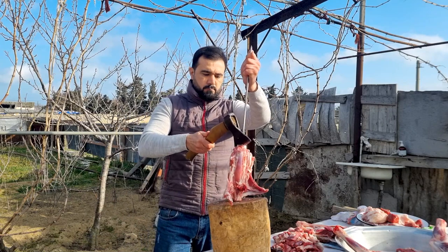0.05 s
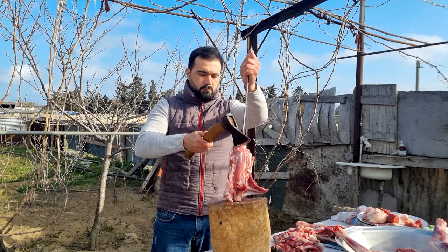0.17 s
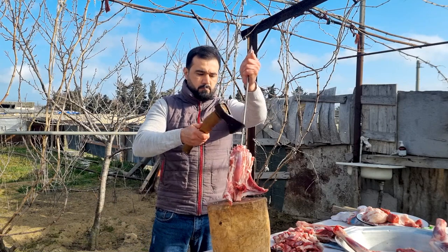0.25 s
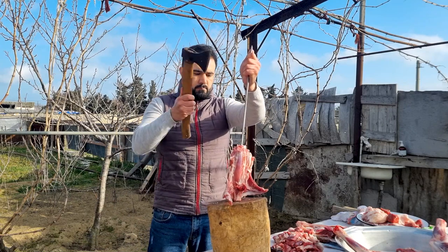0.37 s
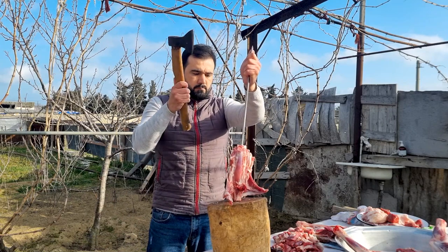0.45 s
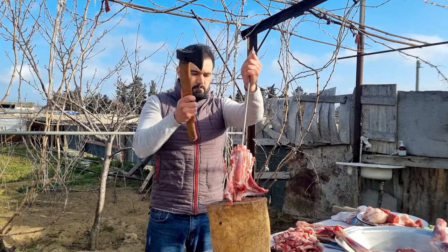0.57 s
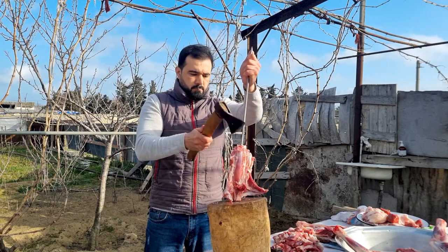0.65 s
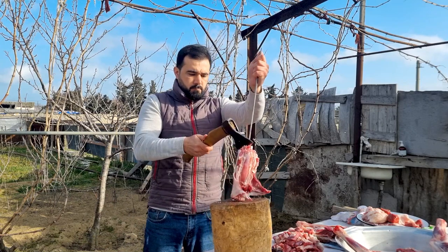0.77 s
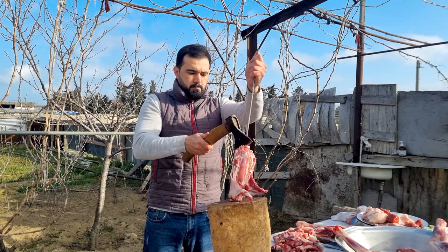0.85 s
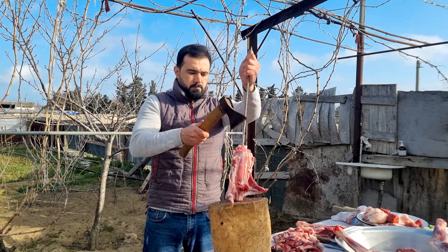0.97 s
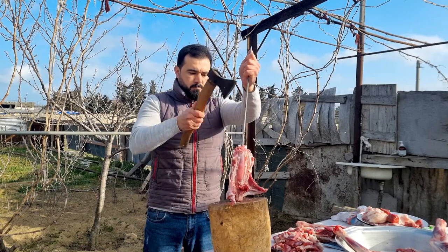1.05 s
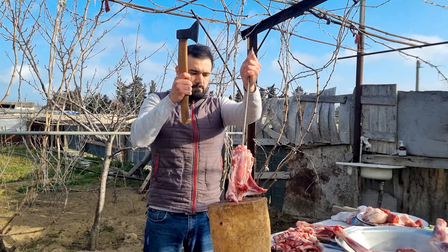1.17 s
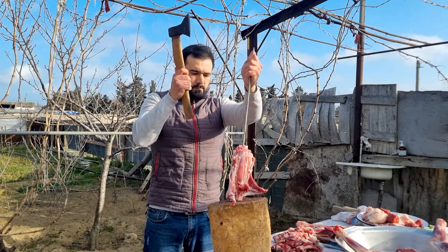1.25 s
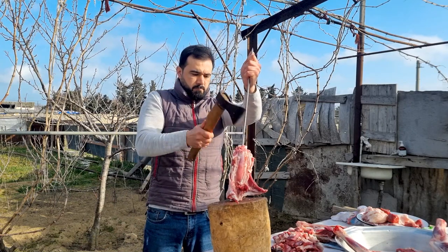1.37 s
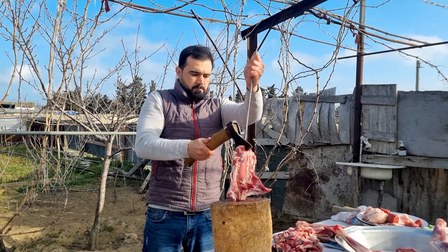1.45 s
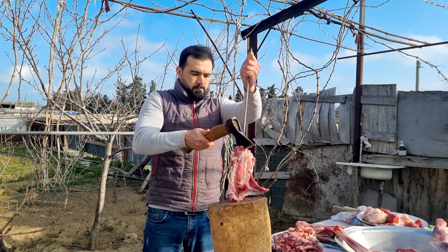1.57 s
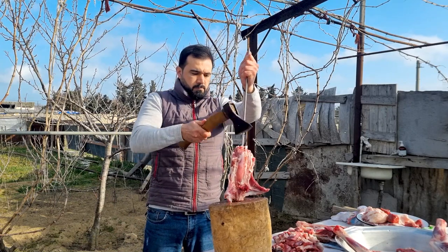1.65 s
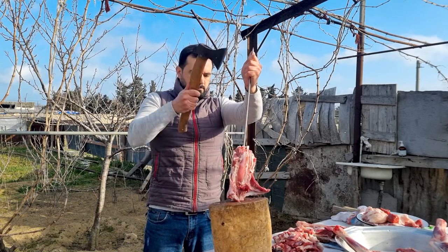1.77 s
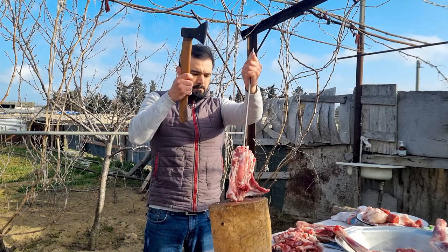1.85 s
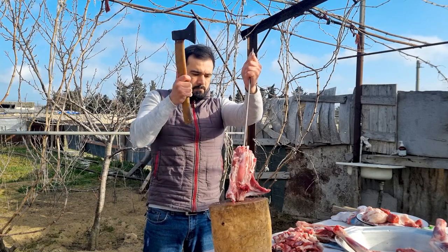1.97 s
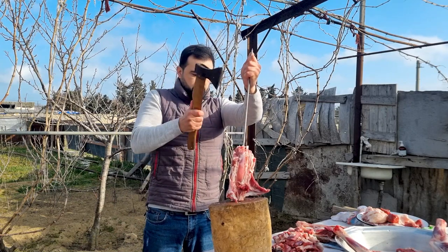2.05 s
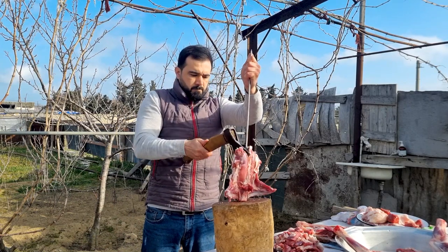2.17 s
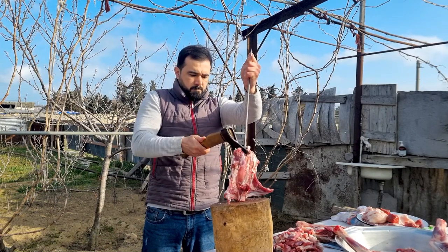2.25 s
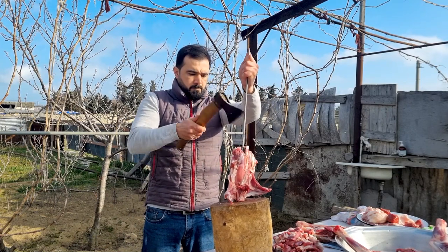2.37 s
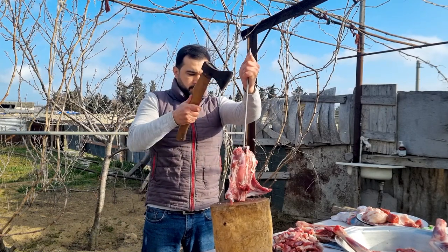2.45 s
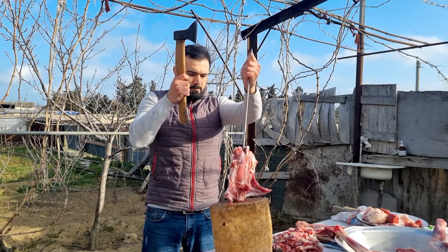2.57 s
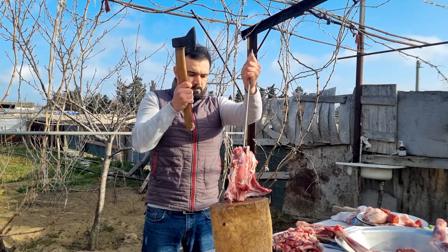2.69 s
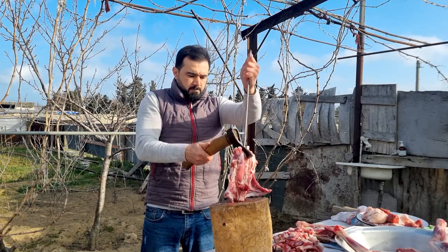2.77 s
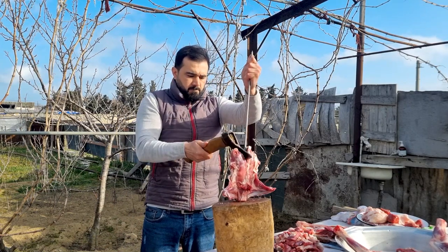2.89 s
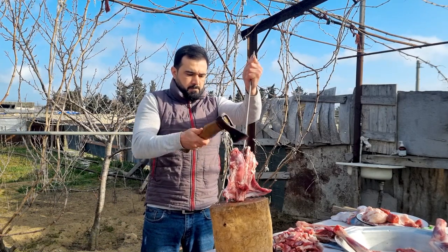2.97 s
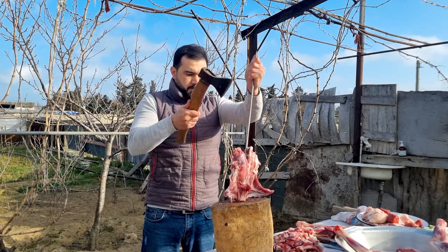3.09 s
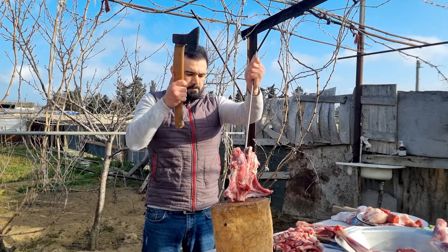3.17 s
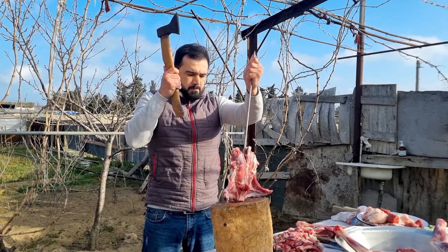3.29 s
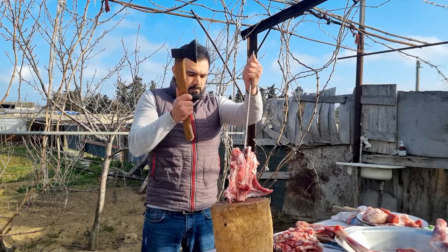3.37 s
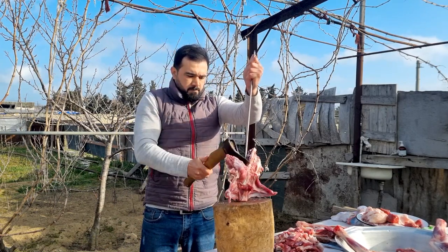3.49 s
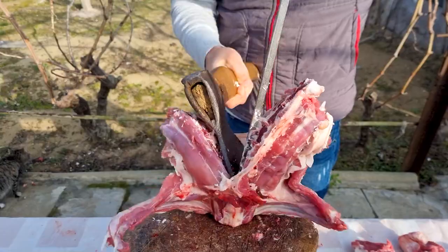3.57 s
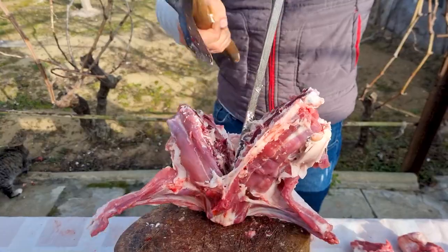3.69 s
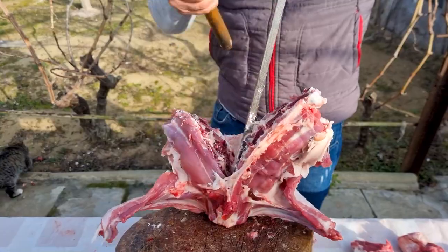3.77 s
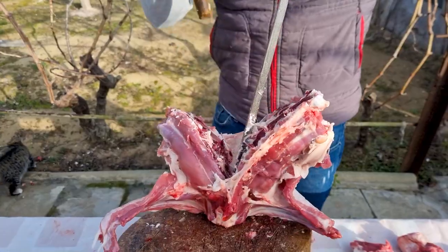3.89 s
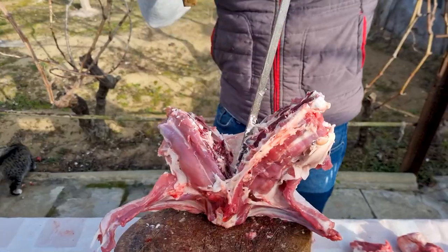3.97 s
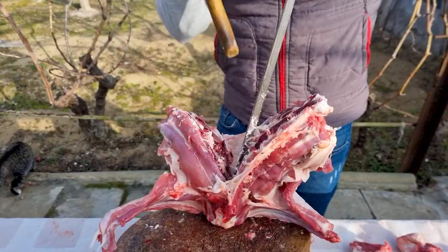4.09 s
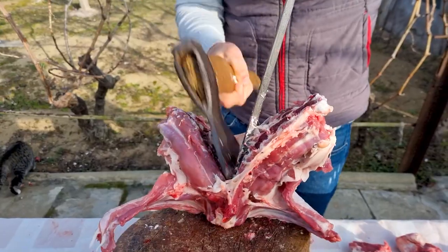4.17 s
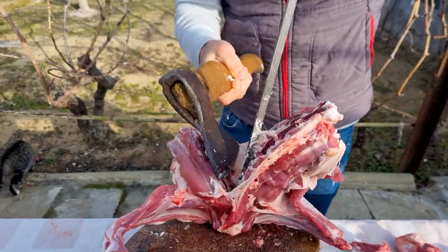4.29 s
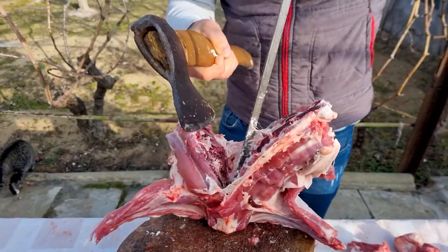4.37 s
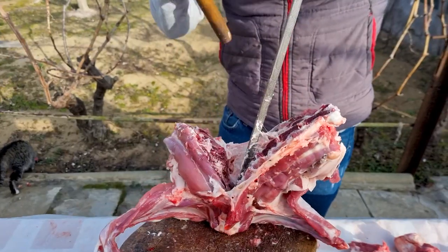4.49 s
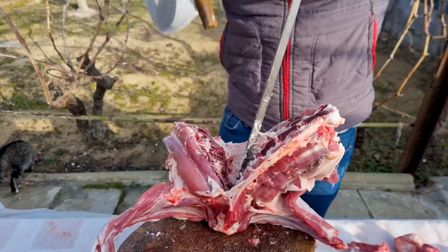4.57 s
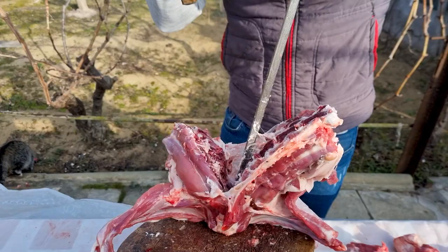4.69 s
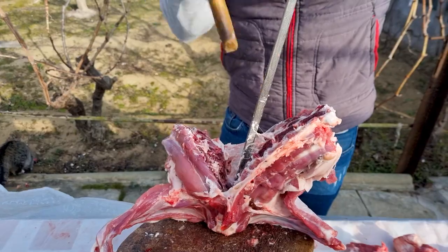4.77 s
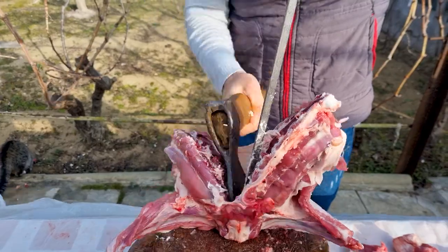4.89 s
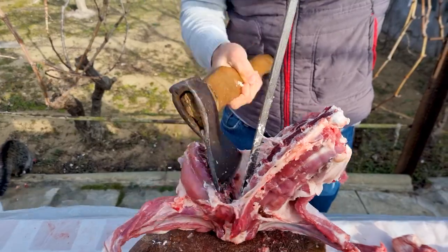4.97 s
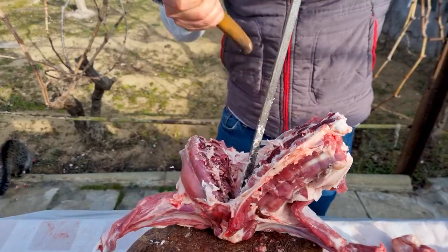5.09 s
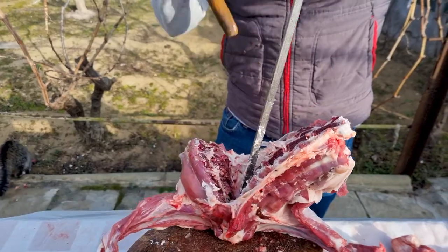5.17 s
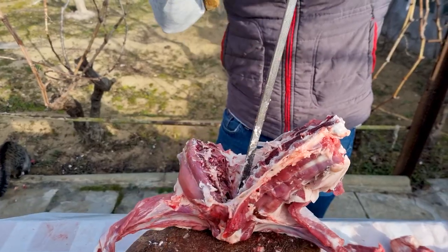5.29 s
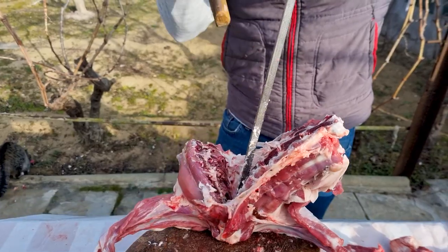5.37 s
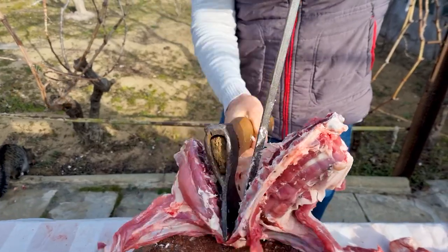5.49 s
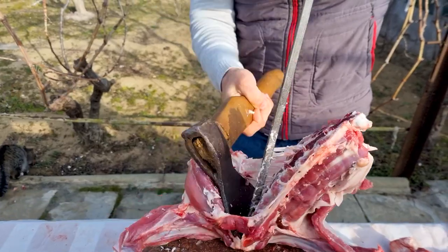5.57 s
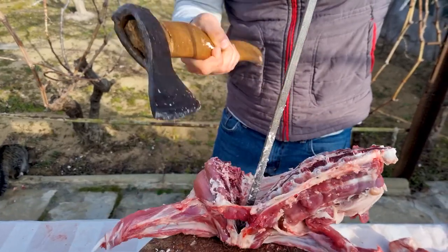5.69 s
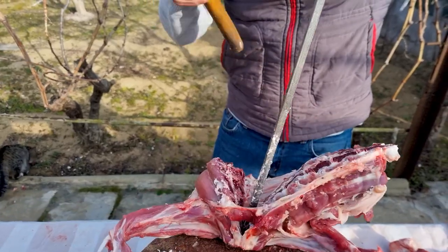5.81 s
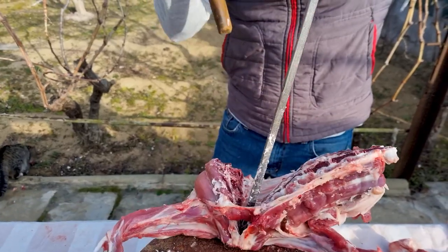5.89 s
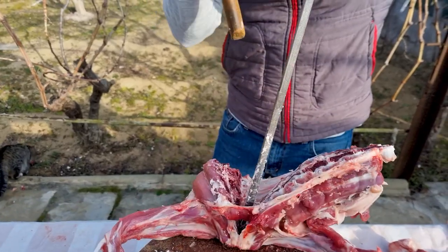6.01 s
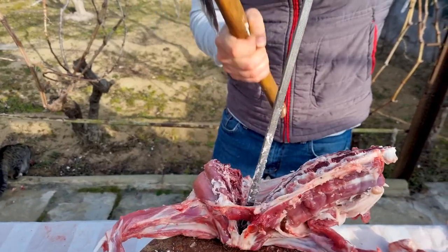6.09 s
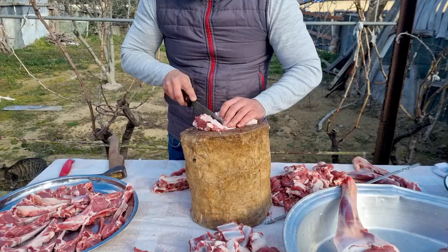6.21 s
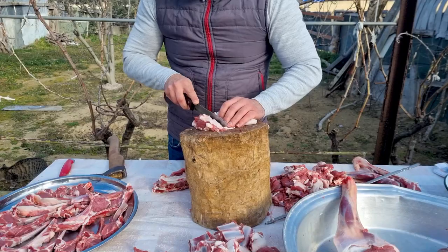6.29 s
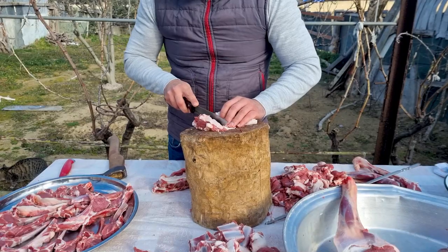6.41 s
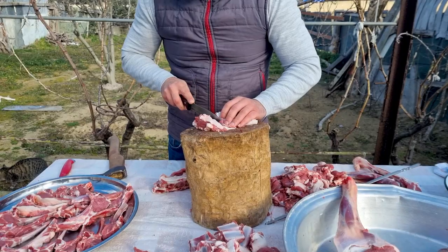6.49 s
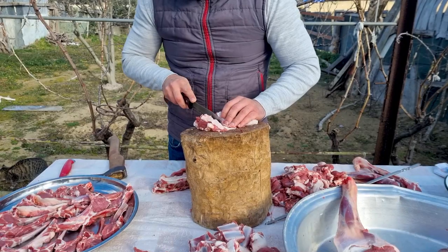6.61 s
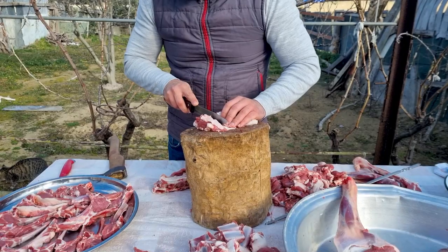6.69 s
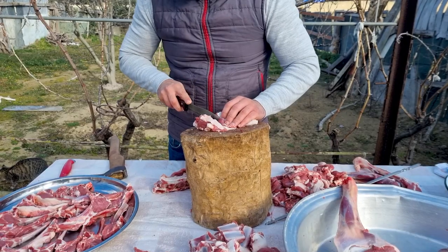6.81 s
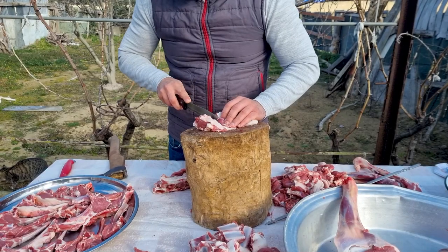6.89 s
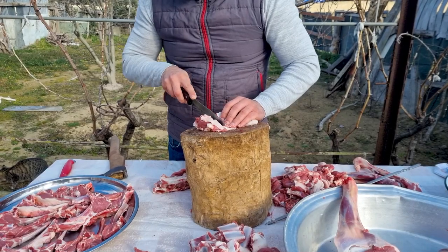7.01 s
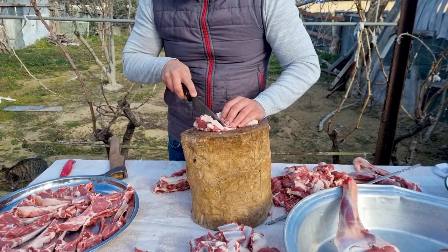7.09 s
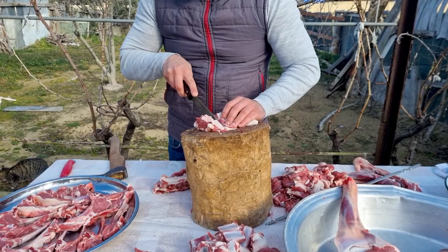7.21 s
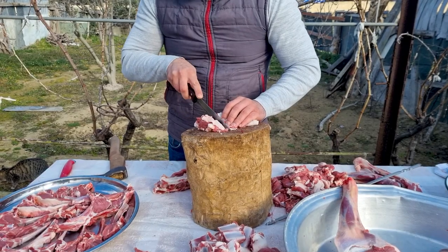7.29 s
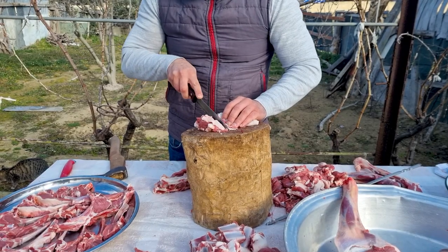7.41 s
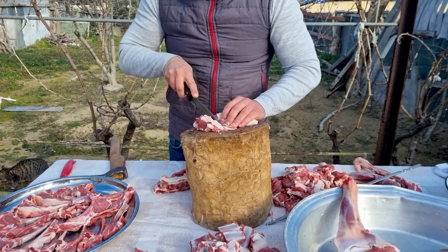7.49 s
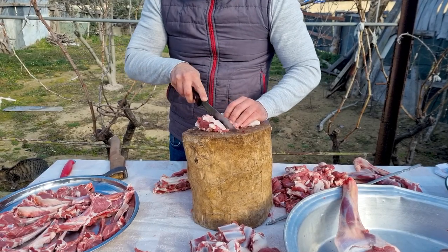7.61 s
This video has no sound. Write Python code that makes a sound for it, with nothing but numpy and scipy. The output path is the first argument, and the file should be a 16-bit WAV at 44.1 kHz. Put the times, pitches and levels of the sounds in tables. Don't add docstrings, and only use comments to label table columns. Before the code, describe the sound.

A hatchet chops a carcass at a steady pace, steel pinging, bone crunching and wood knocking, until the blows stop and a soft windy hush remains.

```python
import sys
import numpy as np
from scipy import signal
from scipy.fft import rfft, irfft, next_fast_len
from scipy.io import wavfile
from scipy.ndimage import uniform_filter1d, map_coordinates

SR = 44100
rng = np.random.default_rng(int(sys.argv[2]) if len(sys.argv) > 2 else 0)


def waveform_to_disk(signal):
    frames = np.transpose(np.atleast_2d(signal))
    scaled = np.clip(frames, -1, 1) * 32767
    samples = np.round(scaled).astype(np.int16)
    wavfile.write(sys.argv[1], SR, samples)


def voltage_ratio(level):
    return 10 ** (np.asarray(level, float) / 20)


N = 337365
TIME = np.arange(N) / SR
STEP = np.arange(0, N, 32) / SR
CLOSE_S, MONO_S = 3.76, 6.345

# frequency in Hz, level in dB per Hz.
CRACK = [(530, -40.5), (900, -4), (1710, 4), (2200, -1.5), (2690, 0), (3590, -5), (5290, -1.5),
         (6450, -6.5), (7800, -31), (10100, -60), (17200, -120)]
# frequency in Hz, level in dB per Hz.
CRUNCH = [(710, -34), (1200, -5), (1710, -7), (2340, -8.5), (2770, -8), (5570, -15), (7800, -27),
          (10100, -58.5), (17200, -120)]
# frequency in Hz, level in dB per Hz.
AIR = [(6500, -59), (7600, -17), (9000, -10.5), (10700, -9.5), (11900, 1.5), (13000, 0), (15600, -6.5),
       (16100, -38)]
# frequency in Hz, level in dB per Hz.
WOOD = [(130, -27), (220, -6.5), (806, -11.5), (899, -14.5), (1540, -14), (1720, -16.5), (1900, -22),
        (2470, -47), (4180, -120)]
# frequency in Hz, level in dB per Hz.
TABLE = [(45, -10), (100, 3.5), (190, -6), (280, -13.5), (500, -62)]
# frequency in Hz, likeness as a ratio.
ALIKE = [(100, 1), (500, 0.67), (1000, -0.22), (2500, -0.54), (5000, 0.13), (12000, -2.3)]
# frequency in Hz, left minus right in dB.
WIDE = [(60, -9.5), (150, 0.5), (380, 3.5), (950, 4.5), (2380, 7.5), (5980, 14), (15000, 10.5)]
# frequency in Hz, left minus right in dB.
CLOSE = [(60, 0), (150, -5.5), (380, 4.5), (950, 1), (2380, 8), (5980, 11.5), (15000, -9)]


def chops():
    crack, pings = contacts()
    knock, knock_tones = knocks()
    crunch_db, steel_db, table_db = rattle()
    close = TIME > CLOSE_S
    grit = voltage_ratio(crunch_db + wobble(500)[0] + 0.79 * wobble(70)[0] - 3.5)
    dry = pings + knock_tones
    dry += coloured(crack * pair(ALIKE), CRACK) + coloured(grit * pair(ALIKE), CRUNCH)

    dulling_db = 0.6 * (crunch_db + 34) - 4 - 2.5 * np.maximum(-46 - crunch_db, 0)
    treble = 3 * crack ** 1.393 + grit * voltage_ratio(dulling_db + 8.4 * wobble(40)[0])
    dry += voltage_ratio(np.where(close, -13, -19)) * coloured(treble * pair([(9000, 0.3)]), AIR)

    over_grit_db = steel_db - crunch_db - 0.38 * np.maximum(steel_db + 61, 0) + 17
    over_grit_db = over_grit_db - 8.5 * (TIME > CLOSE_S - 0.3)
    dry += filtered(grit * voltage_ratio(over_grit_db) * pair(ALIKE), blade)

    wood_rattle = voltage_ratio(crunch_db + 1.9 * wobble(98)[0] - 2)
    dry += coloured((knock + voltage_ratio(-15.5) * crack + wood_rattle) * pair(ALIKE), WOOD)
    dry += voltage_ratio(table_db - 3) * coloured(pair(ALIKE), TABLE)
    return tilted(dry * (TIME < CLOSE_S), WIDE) + tilted(dry * (TIME >= CLOSE_S), CLOSE)


def tilted(x, tilt):
    return filtered(x, lambda hz: voltage_ratio(np.outer([0.5, -0.5], along(tilt, hz))))


# edge contact in seconds, edge level in dB, edge ping in Hz, bone delay in seconds, bone level in dB.
CUT = [
    (.7285, -5, 5170, 0.0051, -22),
    (1.4613, -6.5, 2685, 0.0045, -14),
    (2.158, -6.5, 5585, 0.0027, -6),
    (2.8491, -5.5, 2730, 0.0049, -10),
    (3.5148, -6.5, 5160, .003, -8),
    (4.2328, -6, 5530, 0.0066, -29.5),
    (4.9054, -5, 5660, .0062, -19),
    (5.5415, -2.5, 3830, .0056, -17.5),
    (6.1881, -2.5, 4110, 0.0094, -8),
]
# start in seconds, peak level in dB, ping in Hz.
TICK = [
    (.5854, -66, 1482),
    (.8918, -42.5, 5700),
    (1.4654, -11.5, 5180),
    (1.6482, -48, 4000),
    (2.359, -61.5, 2460),
    (3.5962, -21, 5480),
    (4.262, -20, 5320),
    (4.2744, -24, 1770),
    (4.593, -57.5, 2610),
]


def contacts():
    crack, pings = np.zeros((2, N)), np.zeros((2, N))
    t = np.arange(SR // 8) / SR
    hits = [(s, db, hz, 0.026) for s, db, hz, *_ in CUT]
    hits += [(s + late, db, 2800, 0.038) for s, *_, late, db in CUT]
    hits += [(s, db - 5.5, hz, 0.026) for s, db, *_ in REBOUND for hz in (1696, 3525)]
    hits += [(*row, 0.03) for row in TICK]
    for s, db, hz, t60 in hits:
        side = lean(-0.2 * (db + 5.5))
        add(crack, s, voltage_ratio(db - 8 - 60 * t / t60) * side)
        ring = np.sin(2 * np.pi * hz * t + [[0], [1.1]]) * (1 - np.exp(-t / 0.00033))
        add(pings, s, voltage_ratio(db - 60 * t / 0.0089) * side * ring)
    slide = t[:1400]
    for s, *_ in THUMP:
        add(crack, s - 0.04, voltage_ratio(-87 + 32 * slide / 0.02 + 9 * (s > CLOSE_S))[None])
    return crack, pings


# start in seconds, peak level in dB, pitch in Hz.
KNOCK = [(.743, -9, 374), (.749, -14.5, 347), (.834, -34, 458), (1.484, -18.5, 284.5), (1.489, -3.5, 526),
         (1.509, -21.5, 290), (1.597, -27.5, 334), (2.163, -16, 1180), (2.19, -22.5, 366),
         (2.853, -18, 1273), (2.874, -3, 322.5), (3.024, -42.5, 435), (3.525, -17, 1040), (3.538, -12, 685),
         (3.545, -7.5, 317), (3.597, -22.5, 279), (3.654, -19.5, 506), (4.235, -16.5, 322),
         (4.259, -26, 279), (4.593, -60.5, 1327), (4.914, -27, 283.6), (4.928, -18.5, 342),
         (5.277, -42.5, 610), (5.549, -9, 326), (5.568, -17, 283), (6.199, -8.5, 724),
         (6.219, -15.5, 305.5)]
# start in seconds, click level in dB, knock level in dB, knock in Hz.
REBOUND = [(.791, -24.5, -20.5, 776), (1.5384, -18, -12, 680), (2.2323, -22.5, -16, 840),
           (2.9223, -26.5, -16.5, 818), (3.58, -26, -15, 281), (3.6366, -22, -13.5, 451),
           (3.686, -39, -18.5, 374.5), (4.3, -24.5, -21, 278), (4.3224, -41, -22.5, 494),
           (4.3533, -45, -22, 428), (4.972, -24.5, -26, 507), (4.9955, -41, -22.5, 287),
           (5.034, -46, -29, 467), (5.6088, -23.5, -31, 334), (5.6373, -41, -21.5, 283),
           (5.676, -45, -20.5, 469), (6.2547, -23, -33, 301), (6.33, -46.5, -30.5, 501)]


def knocks():
    knock, tones = np.zeros((2, N)), np.zeros((2, N))
    t = np.arange(SR // 8) / SR
    for s, db, hz in KNOCK + [(s, db, hz) for s, _, db, hz in REBOUND]:
        t60 = 0.058 - 0.0018 * (db + 20)
        fall = voltage_ratio(db - 60 * t / t60) * (1 - np.exp(-t / 0.0012))
        add(knock, s, voltage_ratio(-5) * fall[None])
        add(tones, s, fall * np.sin(2 * np.pi * hz * t - [[0], [1.1]]) * voltage_ratio(-2.5))
    return knock, tones


# crunch in dB, table in dB, crunch fall by 60 dB in seconds, seconds until it lies still.
RATTLE = [
    (-25, -17.5, 0.24, 0.14),
    (-23.5, -14.5, .26, 0.14),
    (-26, -21, .27, .2),
    (-23, -16.5, .26, .19),
    (-25.5, -14, 0.38, .165),
    (-31.5, -17.5, 0.31, 0.14),
    (-28, -15, 0.23, .13),
    (-31, -17.5, 0.32, .13),
    (-26.5, -17.5, 0.22, 0.12),
]


def rattle():
    start = np.array(THUMP)[:, :1] + 0.003
    crunch, table, t60, still = np.array(RATTLE).T[..., None]
    settle = 398.5 * np.maximum(STEP - start - still, 0)
    steel_db = crunch - 900 * np.maximum(STEP - MONO_S, 0)
    fall = 60 / t60
    return [held_db(start, 0, steel_db - 0.43 * settle, 15000, fall),
            held_db(start, 0, steel_db, 15000, fall),
            held_db(start, 0, table - settle, 15000, 0.72 * fall)]


# start in seconds, pitch in Hz, level in dB, hold in seconds,
# lean to the left in dB.
THUMP = [
    (0.7358, 115, -11.5, 0.012, -1.5),
    (1.47, 119.8, -12, 0.034, -0.5),
    (2.1695, 115, -17, .013, -1.5),
    (2.8584, 115.8, -13, 0.026, -2.5),
    (3.5287, 113.7, -17, .035, -0.7),
    (4.239, 104, -16.5, .015, -10),
    (4.9143, 109.6, -12, 0.016, -9.5),
    (5.552, 95.3, -11.5, .029, -3.5),
    (6.202, 99, -8, .0069, 0),
]


def block():
    out, t = np.zeros((2, N)), np.arange(SR // 5) / SR
    for s, hz, db, held, left_db in THUMP:
        upper_db = 1.5 if s < CLOSE_S else -13.5
        fall = voltage_ratio(db - 230 * t - 60 * np.maximum(t - held, 0) / 0.09) * (1 - np.exp(-t / 0.0012))
        upper = voltage_ratio(upper_db) * np.sin(2 * np.pi * 1.55 * hz * t)
        swing = fall * (np.sin(2 * np.pi * hz * t) + upper)
        add(out, s, lean(left_db) * [swing, np.interp(t - 0.0005, t, swing)])
    return out


# start in seconds, pitch in Hz, level in dB,
# fall by 60 dB in seconds, rise in seconds.
RING = [(0, 1640, -71.5, 0.94, .001), (.968, 5170, -53.5, 0.21, 0.0056), (1.545, 1880, -50, 0.37, 0.0063),
        (1.645, 5180, -59, 0.22, 0.0085), (2.5443, 4780, -49.5, 0.021, 0.00046),
        (2.545, 5860, -49, 0.017, 0.00031), (3.735, 5090, -73, 0.22, 0.008), (4.315, 5150, -63, 0.29, .003),
        (5.625, 5230, -62, .3, .0023), (6.265, 1770, -34.5, 0.074, 0.0039), (6.295, 5240, -62, 0.098, .003)]
# start in seconds, hold in seconds, hiss in dB, steel in dB.
SCRAPE = [
    (0.139, 0.042, -54.5, -47),
    (.9, 0.048, -66.5, -45),
    (1.652, 0.022, -70, -53),
]
# frequency in Hz, level in dB per Hz.
SCRAPE_TONE = [(410, -40), (700, -17), (2550, -2), (3540, -11.5), (4570, -7), (6520, -15), (8000, -33),
               (10400, -62.5), (17600, -120)]


def steel():
    out, t = np.zeros((2, N)), np.arange(SR // 2) / SR
    for s, hz, db, t60, rise in RING:
        fall = voltage_ratio(db - 60 * t / t60) * (1 - np.exp(-t / rise))
        add(out, s, lean(18) * fall * np.sin(2 * np.pi * hz * t))
    first = round(0.3 * SR)
    out[:, :first] *= np.clip((0.145 - TIME[:first]) / 0.016, 0, 1)
    s, held, hiss_db, steel_db = np.array(SCRAPE).T[..., None]
    grain = voltage_ratio(1.5 * wobble(300)[0]) * pair(ALIKE)
    hiss = voltage_ratio(held_db(s, held, hiss_db, 1900, 400)) * grain
    rub = voltage_ratio(held_db(s, held, steel_db, 1900, 400)) * grain
    scrape = coloured(hiss, SCRAPE_TONE) + filtered(rub, blade) + voltage_ratio(-28.5) * coloured(hiss, AIR)
    return out + lean(11) * scrape


# frequency in Hz, width in Hz, level in dB.
BLADE = [(1180, 32, 2), (1640, 33, 2.5), (2727, 74, 4), (3530, 28, -3.5), (4160, 44, -7.5),
         (5670, 160, -9.5)]


def blade(f):
    total = 0
    for k, (centre, width, db) in enumerate(BLADE):
        damping = 1j * f * width
        total = total + (-1) ** k * voltage_ratio(db) * damping / (centre * centre - f * f + damping)
    return total


# start in seconds, pitch in Hz, level in dB, length in seconds.
RUSTLE = [(2.565, 5300, -70, 0.019), (3.93, 3080, -71, 0.021), (4.174, 3400, -69, 0.033),
          (5.113, 3230, -66, 0.019), (5.169, 3640, -71, 0.016), (5.34, 4920, -67, 0.0093),
          (5.983, 4700, -70, 0.0091), (6.046, 2840, -63, 0.027), (6.685, 4850, -67.5, .025),
          (7.341, 3300, -70, 0.039), (7.505, 4640, -73.5, .02)]


def rustle():
    out, haze, rough = np.zeros((1, N)), np.zeros((1, N)), wobble(400)
    t = np.arange(-0.12, 0.12, 1 / SR)
    for s, hz, db, length in RUSTLE:
        puff = voltage_ratio(db) * np.exp(-(t[None] / length) ** 2)
        phase = 2 * np.pi * hz * t + 2.2 * np.interp(s + t, TIME, rough[1])
        add(out, s + t[0], voltage_ratio(-4) * puff * np.sin(phase))
        add(haze, s + t[0], voltage_ratio(-5.5) * puff)
    cloth = haze * voltage_ratio(4 * wobble(150)[0]) * pair(ALIKE)
    cloth = coloured(cloth, [(1500, -50), (2800, -2), (5200, -3), (6500, -50)])
    return lean(7.9) * (out * rough[0] + cloth)


# frequency in Hz, level in dB per Hz.
RUMBLE = [(11, -45), (18, -24.5), (45, 0), (72, 5.5), (110, -1.5), (150, -13), (220, -26.5), (400, -54.5),
          (1500, -130)]
# frequency in Hz, level in dB per Hz.
FLUTTER = [(100, -24), (170, -0.5), (322, -12.5), (379, -10), (434, -20), (1500, -59.5), (1950, -87.5),
           (3300, -120)]
# start in seconds, level in dB, pitch in Hz, snap relative to the slap in dB.
GUST = [(3.869, -25, 137.2, -31), (4.685, -28, 87, -31), (4.714, -28.5, 111.7, -25),
        (4.751, -40.5, 137, -8.5), (4.81, -26, 97.5, -10), (4.845, -42, 150, 8), (5.152, -31, 116, -5),
        (5.276, -29.5, 212.5, 12), (5.283, -28.5, 171, 1), (5.321, -28, 108.3, -25),
        (5.84, -32.5, 156, -25), (6.64, -33, 165, -25)]


def wind():
    rumble_db, flutter_db = gusts()
    lumps = voltage_ratio(2.5 * wobble(7.5) + 3.1 * wobble(25)[0])
    out = voltage_ratio(rumble_db + 1.5) * unit(lumps * coloured(pair([(60, 0.6)]), RUMBLE))
    grains = voltage_ratio(5.5 * wobble(50)[0]) * pair([(300, -0.4)])
    out += voltage_ratio(flutter_db + 1.5) * lean(7) * unit(coloured(grains, FLUTTER))
    t = np.arange(SR // 10) / SR
    soft = np.blackman(64)
    for s, db, hz, snap_db in GUST:
        push = np.e * 3.8 * hz * t * np.exp(-1.8 * hz * t)
        slap = np.sin(2 * np.pi * hz * t * (1 - 4 * t)) * push
        noise = unit(np.convolve(rng.standard_normal(len(t)), soft, "same"))
        snap = voltage_ratio(snap_db - 60 * t / 0.014) * (1 - np.exp(-t / 0.0029)) * noise
        add(out, s, voltage_ratio(db + 5.5) * np.array([[1.6], [-0.35]]) * (slap + snap))
    return out


# time in seconds, strength in dB.
WIND = [(0, -47.5), (.5, -42), (.64, -50), (.95, -47.5), (1.42, -43), (2.1, -53), (2.8, -49), (3.45, -53),
        (4.05, -46), (4.62, -52.5), (5.79, -46), (6.38, -42), (6.9, -43), (7.33, -49.5), (7.65, -54)]
# start in seconds, hold in seconds, rumble in dB, flutter relative to it in dB.
SWELL = [(3.865, 0.094, -33, -11), (4.152, 0.082, -36.5, -14.5), (4.69, 0.21, -34, 0), (4.9, 0.11, -37, -2),
         (5.08, 0.15, -36.5, -1.5), (5.22, 0.12, -29.5, -10), (5.38, 0.12, -34, -22),
         (5.84, .06, -32.5, -10), (5.96, .22, -27, -8.5), (6.59, 0.044, -32, -32), (6.64, 0.012, -33, -8.5),
         (6.97, 0.06, -29, -26.5), (7.06, 0.03, -23, -38.5), (7.6, .03, -42, -0.5)]


def gusts():
    breeze_db = curve(WIND)
    s, held, db, flutter_db = np.array(SWELL).T[..., None]
    rumble_swell = held_db(s, held, db, 1200, 300)
    flutter_swell = held_db(s, held, db + flutter_db, 1200, 300)
    return np.maximum(breeze_db, rumble_swell), np.maximum(breeze_db - 22.5, flutter_swell)


# time in seconds, level in dB.
YARD = [(0, -71.5), (1.1, -77.5), (4, -76.5), (6.34, -76), (6.37, -69.5), (6.53, -62.5), (7.65, -62)]
# frequency in Hz, level in dB per Hz.
HUSH = [(120, -28.5), (200, -10), (366, -13), (683, -16.5), (1420, -26), (1980, -30.5), (2290, -35.5),
        (4860, -43), (8270, -61.5), (12200, -61), (16000, -74.5)]
# frequency in Hz, level in dB.
HUM = [
    (694.4, -75.5),
    (1179, -84),
    (1922, -78.5),
    (3844, -84.5),
]


def yard():
    hush_db = curve(YARD)
    z = signal.stft(pair([(500, -0.57)]), nperseg=512)[2]
    patches = uniform_filter1d(rng.standard_normal(z.shape[1:]), size=5, axis=0)
    patches = uniform_filter1d(patches, size=12, axis=1)
    hush = signal.istft(z * voltage_ratio(1.6 * unit(patches)), nperseg=512)[1][:, :N]
    motor = np.zeros(N)
    for hz, db in HUM:
        level = voltage_ratio(db + 2 + 1.3 * wobble(7.9)[0])
        motor += level * np.sin(2 * np.pi * hz * TIME + wobble(31)[0])
    return voltage_ratio(hush_db + 11) * unit(coloured(hush, HUSH)) + voltage_ratio(hush_db + 64.5) * motor


def unit(x):
    return x / np.sqrt(np.mean(x ** 2) + 1e-20)


def along(points, hz):
    f, v = np.transpose(points)
    return np.interp(np.log(hz + 1), np.log(f + 1), v)


def curve(rows):
    return np.interp(TIME, *np.transpose(rows))


def held_db(s, held, db, rise, fall):
    level = db - rise * np.maximum(s - STEP, 0) - fall * np.maximum(STEP - s - held, 0)
    return np.interp(TIME, STEP, np.maximum(level.max(axis=0), -120))


def wobble(rate):
    coarse = TIME[::8]
    curves = []
    for _ in "lr":
        knots = rng.standard_normal(int(N * rate / SR) + 4)
        curves.append(np.interp(TIME, coarse, map_coordinates(knots, [coarse * rate])))
    return np.array(curves)


def filtered(x, response):
    m = next_fast_len(N + 8192, True)
    return irfft(rfft(x, m) * response(np.fft.rfftfreq(m, 1 / SR)), m)[..., :N]


def coloured(x, spectrum):
    gain = voltage_ratio(along(spectrum, np.fft.rfftfreq(4096, 1 / SR)))
    cepstrum = irfft(np.log(gain + 1e-6))
    cepstrum[1:2048] *= 2
    cepstrum[2049:] = 0
    h = irfft(np.exp(rfft(cepstrum)))
    return signal.oaconvolve(x, h[None] / np.linalg.norm(h), axes=1)[:, :N]


def pair(alike):
    def mid_side(hz):
        turn = np.arccos(np.clip(along(alike, hz), -1, 1)) / 2
        return np.array([np.cos(turn), np.sin(turn)])
    mid, side = filtered(rng.standard_normal((2, N)), mid_side)
    return np.array([mid + side, mid - side])


def lean(db):
    return voltage_ratio(np.array([[db / 2], [-db / 2]]))


def add(track, s, sound):
    part = track[:, max(round(s * SR), 0):][:, :sound.shape[1]]
    part += sound[:, :part.shape[1]]


def scene():
    both = chops() + block() + steel() + rustle() + wind() + yard()
    return np.where(TIME > MONO_S, both.mean(axis=0), both)


def roll_off(x):
    return signal.sosfilt(signal.butter(12, 16810, fs=SR, output="sos"), x)


def record(dry):
    held = dry / (1 + np.abs(dry) ** 6) ** (1 / 6)
    limit = [(15900, 0), (16300, -14), (16800, -30), (17000, -90)]  # Hz, dB
    mix = filtered(held, lambda hz: voltage_ratio(along(limit, hz)))
    return roll_off(mix)


dry = scene()
out = record(dry)
waveform_to_disk(out)
```